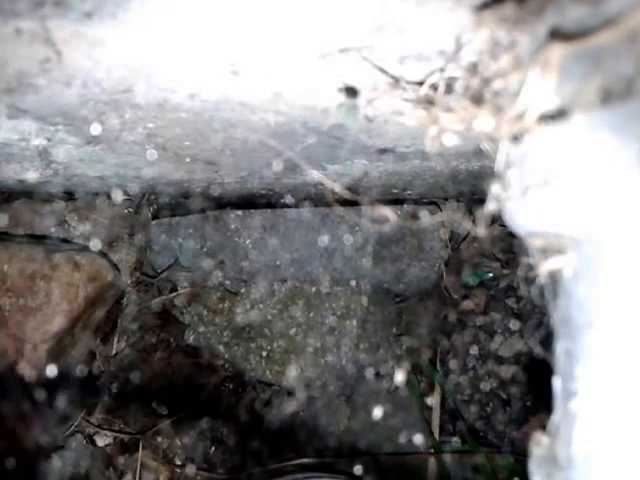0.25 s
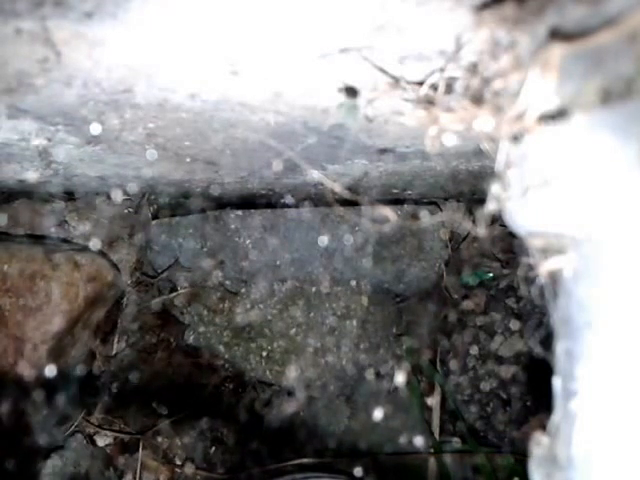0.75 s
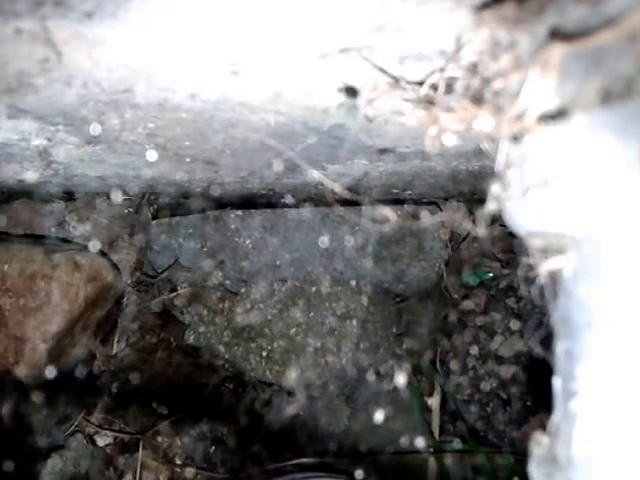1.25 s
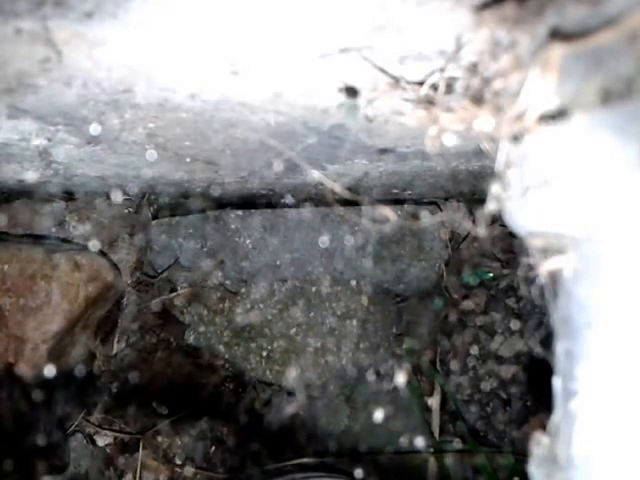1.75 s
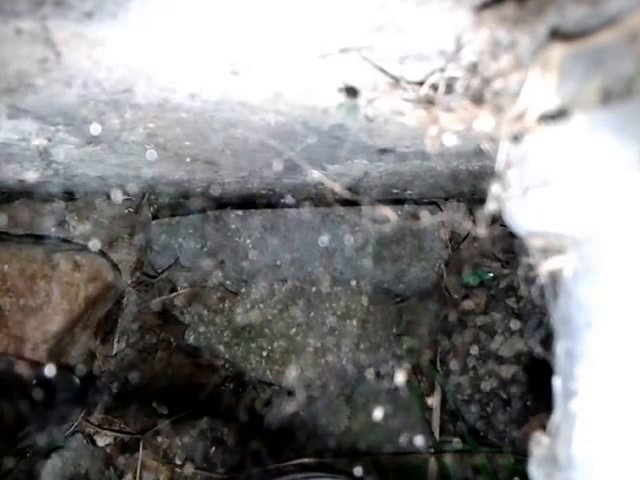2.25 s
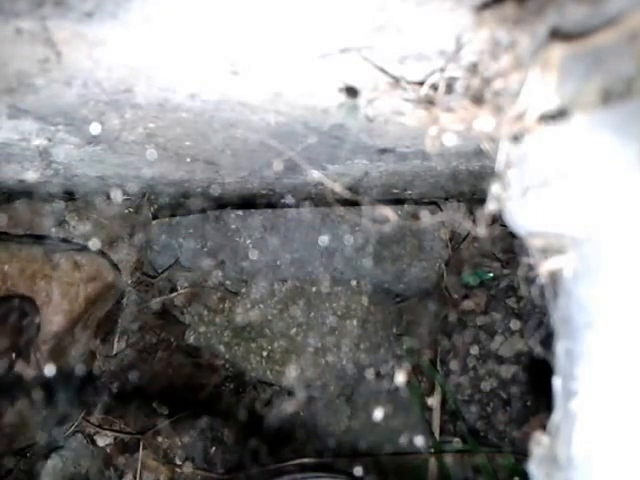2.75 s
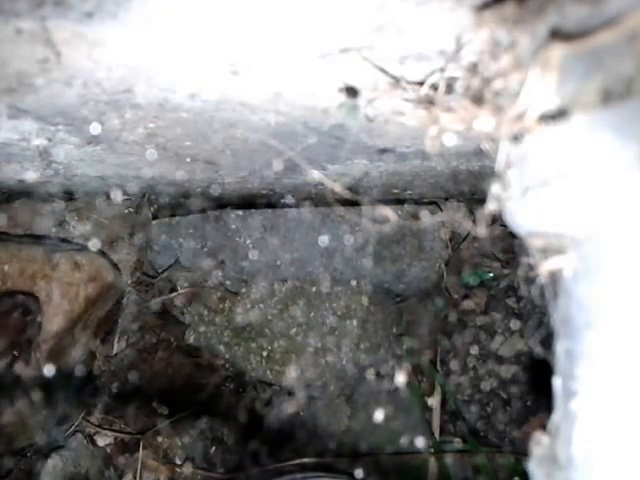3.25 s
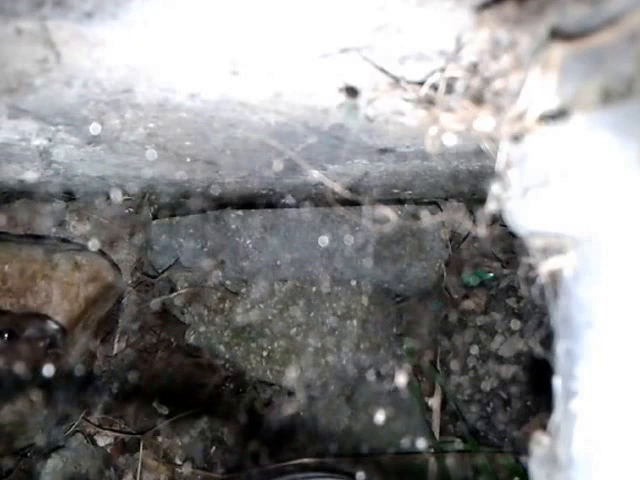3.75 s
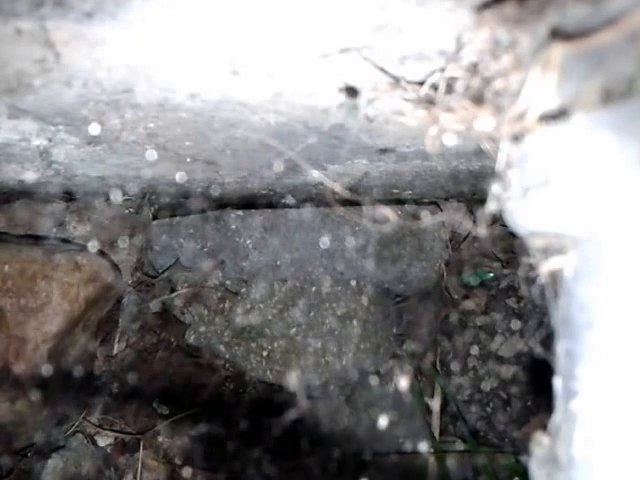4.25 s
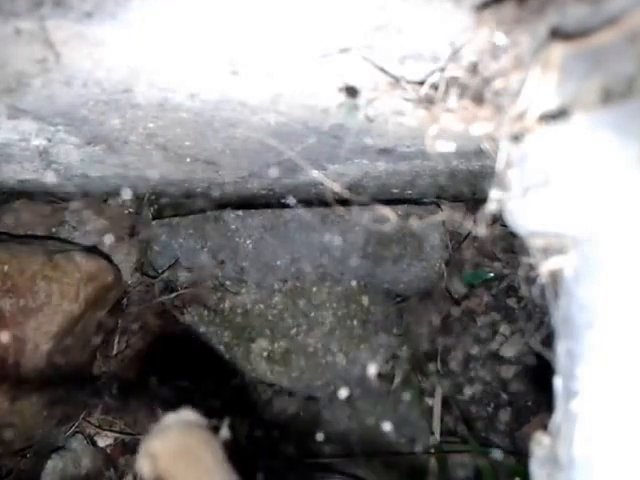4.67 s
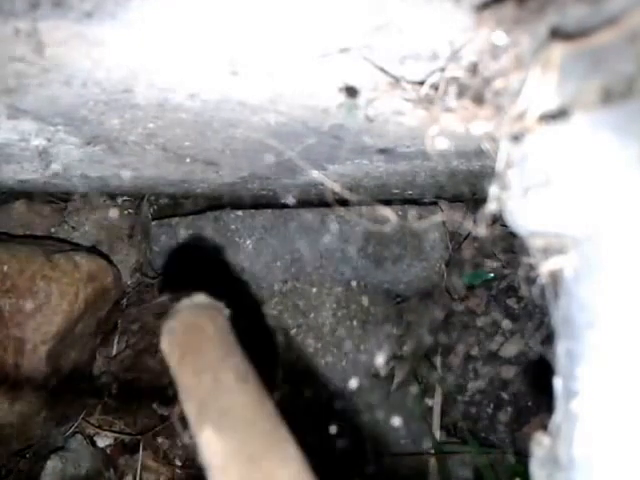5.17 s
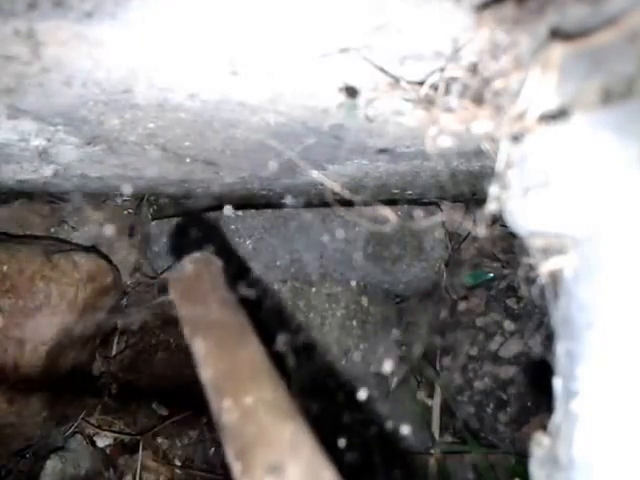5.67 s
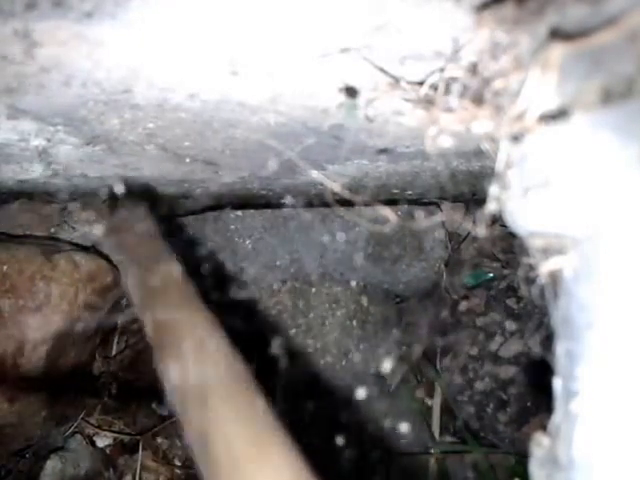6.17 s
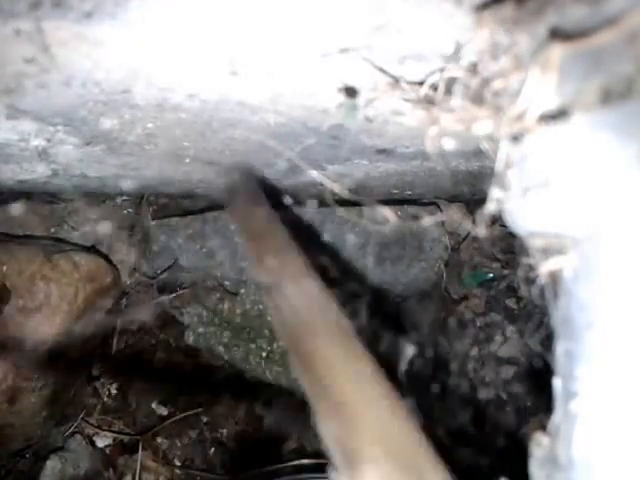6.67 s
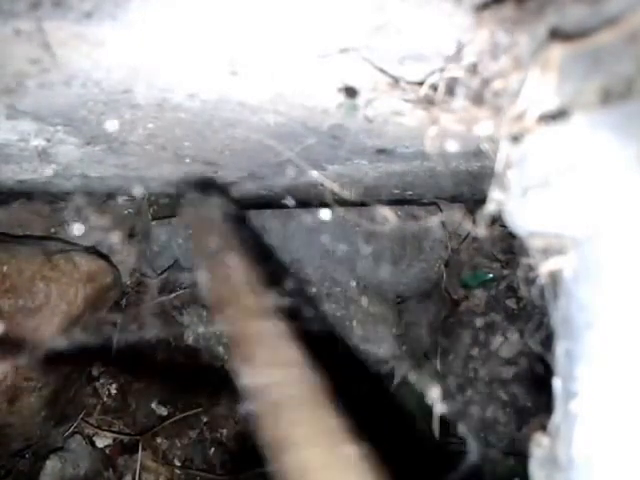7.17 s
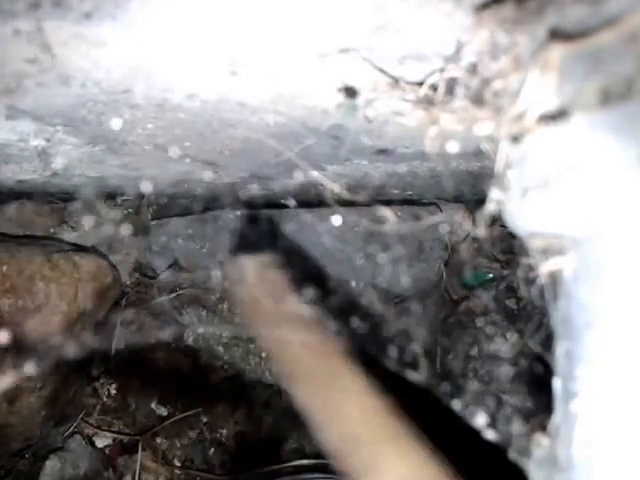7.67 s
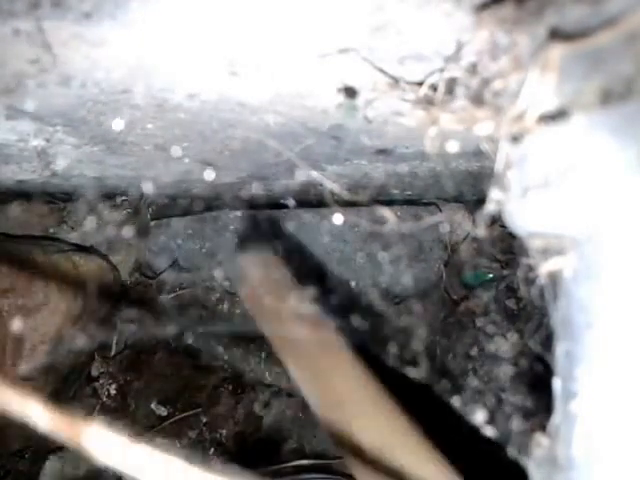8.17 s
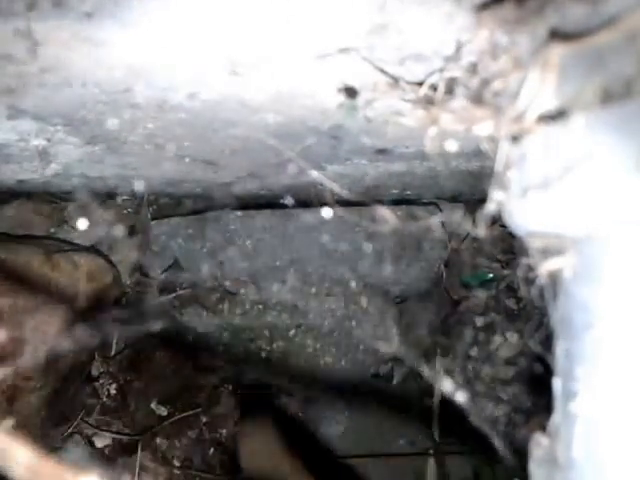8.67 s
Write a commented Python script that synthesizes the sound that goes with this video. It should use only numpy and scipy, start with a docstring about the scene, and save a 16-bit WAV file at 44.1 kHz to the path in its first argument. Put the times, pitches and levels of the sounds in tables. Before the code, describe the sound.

Brief leaf rustle, a quiet lull with a tiny squeak, then busy crunching, scraping and hard wooden knocks on stone, very close.

```python
"""A wooden stick in dry leaves and grit between stones, outdoors, close to a small microphone. Steady hiss and
a low distant rumble lie beneath; the stick first brushes the leaves loosely in noise grains. A faint far whirr,
made of narrow noise, swells twice; from 2 s the stick presses down and squeaks at about 3.3 s. Strokes and
bright snaps then thicken, the tip grinds the grit and rings the stick's middle modes, and the dragged tip
shakes the stick. Knocks on stone ring its short modes, the strongest from 5.6 s on, and the loudest overload
the microphone."""
import sys
import numpy as np
from scipy import signal
from scipy.fft import rfft, irfft, next_fast_len
from scipy.io import wavfile
from scipy.ndimage import uniform_filter1d

SR = 44100
rng = np.random.default_rng(int(sys.argv[2]) if len(sys.argv) > 2 else 0)


def wav_record(signal):
    """Record a signal, one row per channel, as 16-bit PCM in the file named by sys.argv[1]."""
    frames = np.transpose(np.atleast_2d(signal))
    bounded = np.clip(frames, -1, 1)
    # unit amplitude maps onto the largest positive 16-bit level
    quanta = np.round(bounded * 32767).astype(np.int16)
    wavfile.write(sys.argv[1], SR, quanta)


N = 393813
TIME = np.arange(N) / SR  # s

# spectrum of the hiss and far rumble: pitch_hz, density_db (per Hz, relative)
AIR_SPECTRUM = [(12, -32.5), (20, -20), (80, -4), (106, -8), (119, -6.5), (232, -18.5), (427, -26.5),
                (631, -28), (705, -28), (788, -28), (3260, -30), (5530, -25.5), (9390, -25), (14300, -21),
                (15500, -29)]
AIR_DB = -66  # middle level, rms
# faint far whirr: start_s, length_s, level_db
WHIRR_SWELLS = [(.92, 0.65, -79), (2.3, 0.53, -80)]
WHIRR_HZ, WHIRR_FADE_DB_PER_S = 1556, 136

# a twig chafing on stone: start_s, length_s, pitch_hz, peak_db
TWIG_SQUEAKS = [(3.31, 0.031, 3080, -55), (3.302, 0.023, 2030, -62), (3.35, 0.055, 890, -59),
                (3.386, 0.042, 3020, -58), (3.388, 0.08, 4350, -57), (3.406, .06, 5700, -51)]

# strokes through the litter and faint rustles between them: start_s, length_s, leaf_start_db, leaf_end_db,
# drag_db (stick, relative to leaves), grit_db (relative to leaves)
STICK_STROKES = [(0.19, 0.18, -66, -74, -14, -11.5), (0.413, 0.34, -53, -40, -18, -15),
                 (0.819, .035, -58, -53.5, -10.5, -8.5), (.9, 0.15, -68.5, -78, -2, -3.5),
                 (1.045, 0.071, -59, -54, -14, -11.5), (1.15, 0.23, -68.5, -76, -3, -6),
                 (1.5, .28, -68, -74, -6, -10), (2.15, 0.26, -77.5, -62.5, -9.5, -10),
                 (2.45, 0.64, -76.5, -74, -5, -4), (3.16, 0.055, -76.5, -65.5, -2, -2),
                 (3.309, 0.16, -62, -60, -10, -12), (3.55, 0.035, -67, -65.5, -6, -12),
                 (3.62, .38, -80, -85, -14, -8), (4.016, 0.067, -44.5, -46.5, -12, -7),
                 (4.15, 0.21, -68, -70, -10, -13), (4.405, 0.042, -50.5, -44.5, -12, -6.5),
                 (4.469, 0.068, -44, -37, -3, -6), (4.58, 0.11, -47.5, -38, -12.5, -6.5),
                 (4.758, 0.086, -44, -41.5, -9.5, -7.5), (4.87, 0.043, -42, -37, -9, -7),
                 (4.93, 0.18, -43, -50.5, -4.5, -5), (5.16, 0.087, -63.5, -71, -5, -8),
                 (5.25, 0.042, -59.5, -47.5, -6, -4), (5.33, 0.066, -57.5, -53, -9.5, -7),
                 (5.442, 0.045, -51, -44, -10, -7.5), (5.52, 0.19, -51, -54.5, -12, -11),
                 (5.78, 0.033, -44.5, -43.5, -11, -8), (5.841, 0.095, -55, -45.5, -8.5, -3),
                 (5.97, 0.13, -49.5, -59, -6, -4), (6.142, 0.19, -55.5, -58, -6.5, -7),
                 (6.34, 0.16, -71, -69.5, -7, -9.5), (6.492, 0.25, -42.5, -49, -13, -6.5),
                 (6.874, 0.19, -51, -60, -9.5, -9.5), (7.18, 0.11, -53, -57, -9, -8.5),
                 (7.31, 0.042, -53, -44.5, -10, -9.5), (7.39, 0.08, -54.5, -38.5, -6.5, -0.5),
                 (7.55, .29, -61, -56, -8, -12.5), (7.85, 0.025, -44.5, -51.5, -13.5, -14.5),
                 (7.89, 0.11, -53.5, -47.5, -13.5, -10), (8.039, 0.075, -51, -41, -9, -7),
                 (8.13, 0.057, -46.5, -49.5, -8.5, -27), (8.191, 0.088, -50.5, -42.5, 0.5, -2.5),
                 (8.33, 0.079, -73, -53.5, -15, -14), (8.41, 0.066, -55, -44.5, -4.5, -9),
                 (8.53, 0.1, -52, -46.5, -12.5, -15), (8.63, 0.26, -43.5, -46.5, -14.5, -10),
                 (8.89, 0.047, -43.5, -36.5, -17, -14)]
BITE_DB_PER_S, SETTLE_DB_PER_S = 1501.5, 300.5  # rise before a stroke, fall after it
# litter stirring faintly between strokes: leaves_db, stick_db, grit_db
IDLE_LEVELS = [-85, -90.5, -89]
# leaves brushed loosely, before the stick presses down: pitch_hz, density_db (per Hz, relative)
LOOSE_LEAF_SPECTRUM = [(1470, -33), (2500, -6), (3120, -12), (6440, -4), (7110, -5.5), (7860, -2),
                       (11100, -9), (14500, -14), (15500, -18.5)]
# leaves under the pressing stick: pitch_hz, density_db (per Hz, relative)
PRESSED_LEAF_SPECTRUM = [(1470, -41.5), (2500, -8), (2890, -7.5), (3890, -9), (4780, -5.5), (5620, -2),
                         (6060, -3), (6640, -4.5), (8880, -7.5), (14400, -15), (15500, -19)]
PRESS_S = 2.0
# rings of curled leaves: pitch_hz, width_hz, level_db (relative)
CURLED_LEAF_RINGS = [(4347, 100, -2.5), (5630, 450, -0.5), (6330, 330, 0), (6900, 730, -6)]
# middle rings of the stick, shaken as its tip scrapes the grit: pitch_hz, width_hz, level_db (relative)
STICK_MIDDLE_RINGS = [(1260, 200, -0.4), (1550, 790, -8.5), (1853, 120, 3), (2300, 220, -8), (3050, 530, -0.5)]
# broad rings of the dragged stick, damped by the hand: pitch_hz, width_hz, level_db (relative)
DRAGGED_STICK_RINGS = [(289, 99, 5), (356, 17, -6), (520, 160, -2), (840, 220, -5)]

# leaves and twigs snapping: start_s, peak_db (before filtering), centre_hz
LEAF_SNAPS = [(0.189, -50, 6030), (0.293, -48.5, 6500), (0.414, -54, 6640), (0.447, -42, 6400),
              (0.5327, -29.5, 7700), (0.5472, -23.5, 8000), (0.5672, -29, 9200), (0.6335, -27, 6700),
              (0.704, -25.5, 6860), (0.753, -25.5, 6900), (0.8453, -48, 6540), (2.61, -51.5, 5500),
              (3.318, -49, 6250), (3.569, -38.5, 6370), (4.0156, -25.5, 5800), (4.4013, -26, 5970),
              (4.653, -26, 5640), (4.671, -33, 6550), (4.748, -13, 6500), (4.788, -22.5, 6000),
              (4.822, -25, 5800), (4.8377, -30, 5380), (4.8688, -29, 6900), (4.9188, -24, 6300),
              (5.007, -26, 5630), (5.0983, -48, 5470), (5.178, -55, 3540), (5.452, -22, 5330),
              (5.468, -26.5, 6000), (5.7776, -21.5, 5870), (5.797, -26.5, 6400), (6.027, -37, 6500),
              (6.082, -36, 6540), (6.169, -34.5, 6000), (6.2074, -35.5, 4570), (6.26, -45, 7000),
              (6.292, -37.5, 6130), (6.4895, -24, 5400), (6.8997, -34, 5380), (6.946, -35, 5270),
              (7.3244, -29, 5740), (7.352, -33, 5500), (7.652, -33.5, 6000), (7.734, -32.5, 5800),
              (7.8528, -33, 6000), (8.895, -29, 5780)]
SNAP_T60_S = 0.025

# bending modes of the stick: pitch_hz, level_db (relative), t60_s (before the ring factor)
STICK_MODES = [(327.7, -9.5, 0.05), (431, -4.5, 0.03), (557, -9, 0.033), (749, -2.8, 0.031),
               (1329, -5, 0.016), (1407, -7.5, 0.01), (1791, 0.7, 0.013), (2066, 3.5, 0.0089),
               (2831, -2, 0.015), (3487, -5, 0.013), (3980, -7, 0.014), (5067, -1.5, 0.012),
               (5932, 3.5, 0.014), (6806, -3, 0.013)]
# stick on stone: start_s, peak_db (before filtering), place_hz (place struck, as loudest ring),
# low_hz (loudest low ring), low_db (low modes), high_db (high modes), ring (factor on fading times)
STONE_KNOCKS = [(3.189, -42, 2040, 880, -1, -2, 1.8), (4.339, -50, 1270, 307, 6, -9, 1.2),
                (4.494, -25.5, 1260, 294, -1.5, -21, 1), (5.571, -7, 1620, 394, -7.5, -10, 1.5),
                (5.58, -15.5, 1280, 510, -3.5, -10, 1.62), (6.151, -29, 1300, 503, -6.5, -0.5, 2),
                (6.961, 2.5, 1750, 750, -10, -0.5, 1.47), (7.175, -14, 1140, 830, -13.5, -10.5, 1.5),
                (7.407, 7, 1760, 764, -8, -6.5, 1.07), (7.464, -4, 2030, 750, -5.5, -5.5, 1.63),
                (7.489, -9.5, 1770, 750, 0.5, -10, 1.7), (8.185, -17, 985, 730, 2, -23, 0.76),
                (8.205, -20.5, 1030, 764, 2.5, -13, 1.7), (8.27, -2.5, 2130, 294, -2.5, -1, 0.96),
                (8.471, -21.5, 1780, 680, 3.5, -2.5, 1.24), (8.615, -24, 1740, 720, 2.5, 4.5, 1.4),
                (8.651, -31, 1780, 696, 11, -26, 1.9), (8.751, -5, 1360, 800, -13, -6.5, 1.6),
                (8.916, -26, 1740, 750, 5, -5, 1.4)]
LOW_HZ, HIGH_HZ = 1000, 3300  # low modes lie below the first, high modes above the second

TOP_HZ = 15050  # upper edge of the microphone's band


def undb(db):
    """Amplitude ratio of a level in dB."""
    return 10 ** (np.asarray(db) / 20)


def unit(x):
    """Scale x to rms 1."""
    return x / np.sqrt(np.mean(x ** 2))


def colour(x, points):
    """Shape the spectrum of x by (Hz, dB) points, straight lines over log frequency; rms 1."""
    hz, db = np.transpose(points)
    size = next_fast_len(N)
    log_hz = np.log(np.arange(size // 2 + 1) * SR / size + 1)
    gain = undb(np.interp(log_hz, np.log(hz), db, left=-90, right=-90))
    return unit(irfft(rfft(x, size) * gain, size)[:N])


def walk(rate):
    """Random levels, rate per second, slewed from one to the next; rms 1."""
    hold = int(SR / rate)
    steps = np.repeat(rng.standard_normal(N // hold + 1), hold)
    return unit(uniform_filter1d(steps, hold)[:N])


def span(start, length, first_db, last_db, rise, fall):
    """Gain that slides between two levels; it rises before and falls after at fixed dB per second."""
    before_db = np.maximum(rise * (start - TIME), 0)
    after_db = np.maximum(fall * (TIME - start - length), 0)
    level_db = np.interp(TIME, [start, start + length], [first_db, last_db])
    return undb(level_db - before_db - after_db)


def rings(x, modes, flicker_db):
    """Noise through steep resonances, each swelling by itself; rms 1."""
    twice = np.sqrt(np.sqrt(2) - 1)  # two passes narrow a resonance by this factor
    total = np.zeros(N)
    for hz, width, db in modes:
        ring = signal.filtfilt(*signal.iirpeak(hz, twice * hz / width, SR), x)
        total += undb(db + flicker_db * walk(11)) * ring
    return unit(total)


def grains(rate, spread_db, tail_s, bed):
    """Tiny breaks of very unequal size, each a short puff of noise, over a finer bed."""
    breaks = rng.random(N) < rate / SR
    size = breaks * undb(spread_db * np.minimum(rng.exponential(size=N), 4.5))
    puffs = signal.lfilter([1], [1, -np.exp(-1 / (tail_s * SR))], size ** 2)  # power
    return np.sqrt(puffs / puffs.mean() + bed) * rng.standard_normal(N)


def add(out, s, sound, peak_db):
    """Mix a sound into out at s seconds, scaled to the given peak."""
    i = int(s * SR)
    out[i:i + len(sound)] += (sound * undb(peak_db) / np.abs(sound).max())[:N - i]


def hiss_and_rumble():
    """Steady shaped noise whose level wavers slightly."""
    return colour(rng.standard_normal(N), AIR_SPECTRUM) * undb(AIR_DB + 0.55 * walk(2.8))


def far_whirr():
    """Narrow noise around one pitch that comes and goes."""
    fade = WHIRR_FADE_DB_PER_S
    swell = sum(span(s, length, db, db, fade, fade) for s, length, db in WHIRR_SWELLS)
    return rings(rng.standard_normal(N), [(WHIRR_HZ, 110, 0)], 1.5) * swell


def squeaks():
    """A twig chafing on stone: narrow, rough rings of noise that swell and fade."""
    out = np.zeros(N)
    for s, length, hz, peak_db in TWIG_SQUEAKS:
        size = int(length * SR)
        ring = signal.filtfilt(*signal.iirpeak(hz, 14, SR), rng.standard_normal(size))
        add(out, s, ring * np.hanning(size), peak_db)
    return out


def stroke_gains():
    """Gains of leaves, dragged stick and grit: the powers of all strokes add to the idle stirring."""
    power = undb(IDLE_LEVELS)[:, None] ** 2
    for *stroke, drag_db, grit_db in STICK_STROKES:
        leaf_gain = span(*stroke, BITE_DB_PER_S, SETTLE_DB_PER_S)
        power = power + np.outer(undb([0, drag_db, grit_db]), leaf_gain) ** 2
    return np.sqrt(power)


def crackling_leaves():
    """Dense tiny breaks, coloured by loose then pressed leaves, also ring the curled leaves."""
    crackle = grains(900, 3.4, 0.002, 0.39)
    loose = colour(crackle, LOOSE_LEAF_SPECTRUM)
    pressed = colour(crackle, PRESSED_LEAF_SPECTRUM)
    leaves = np.where(TIME < PRESS_S, loose, pressed)
    return unit(leaves + 0.8 * rings(crackle, CURLED_LEAF_RINGS, 4.6))


def scraped_stick(slip):
    """The small slips of the tip on the grit excite the middle rings of the stick."""
    return rings(slip, STICK_MIDDLE_RINGS, 2.8)


def dragged_stick(slip):
    """The same slips shake the lowest rings of the stick, thinned below 230 Hz."""
    high_pass = signal.butter(3, 230, "high", fs=SR, output="sos")
    return signal.sosfilt(high_pass, rings(slip, DRAGGED_STICK_RINGS, 4.0))


def litter():
    """One stuttering tip moves leaves, grit and stick together; the stick's level stutters least."""
    leaf_gain, drag_gain, grit_gain = stroke_gains()
    stutter_db = walk(45)
    slip = grains(550, 2.6, 0.0029, 0.23)
    leaves = crackling_leaves() * leaf_gain * undb(stutter_db)
    grit = scraped_stick(slip) * grit_gain * undb(stutter_db)
    drag = dragged_stick(slip) * drag_gain * undb(0.62 * stutter_db)
    return leaves + grit + drag


def snaps():
    """A leaf or twig snaps: a burst of bright noise over a duller body that dies fast."""
    out, t = np.zeros(N), TIME[:SR // 8]
    envelope = np.exp(-np.log(1000) * t / SNAP_T60_S) * np.minimum(t / 0.0012, 1)
    for s, peak_db, hz in LEAF_SNAPS:
        noise = rng.standard_normal(len(t))
        body = signal.lfilter(*signal.iirpeak(2200, 0.6, SR), noise)
        bright = signal.filtfilt(*signal.iirpeak(hz, 1.4, SR), noise)
        add(out, s, (bright + 0.19 * body) * envelope, peak_db)
    return out


def stick_ringing(t, place_hz, low_hz, low_db, high_db, ring):
    """Decaying bending modes, loudest near those that the struck place favours."""
    hz, db, t60 = np.transpose(STICK_MODES)
    phase, size = rng.standard_normal((2, len(hz)))
    low_mode_db = low_db - 13 * np.abs(np.log2(hz / low_hz))  # 13 dB per octave
    middle_db = -8 * np.abs(np.log2(hz / place_hz))
    place_db = np.where(hz < LOW_HZ, low_mode_db, np.where(hz > HIGH_HZ, high_db, middle_db))
    gain = undb(db + place_db + 1.8 * size)
    # the stone damps the high modes whatever the grip
    fade_s = np.where(hz > HIGH_HZ, t60, ring * t60)
    fade = np.exp(-np.log(1000) * t[:, None] / fade_s)
    return (fade * np.sin(2 * np.pi * t[:, None] * hz + 1.02 * phase)) @ gain


def gritty_contact(t, place_hz, high_db, ring):
    """Grit roughens the contact as a short noise burst and scatters after it as a longer tail."""
    noise = rng.standard_normal((2, len(t)))
    dull = signal.filtfilt(*signal.iirpeak(place_hz, 0.7, SR), noise[0])
    bright = signal.filtfilt(*signal.iirpeak(5600, 0.8, SR), noise[1])
    contact = 0.97 * np.exp(-(t / 0.0044) ** 2)
    scatter = 0.27 * np.exp(-t / (0.0079 * ring))
    return (dull + 0.5 * undb(high_db) * bright) * (contact + scatter)


def knocks():
    """Each blow on stone rings the stick and crunches grit; the sum is thinned below 260 Hz."""
    out, t = np.zeros(N), TIME[:SR // 6]
    onset = np.clip(t / 0.000471 - 1, 0, 1)  # contact builds within a millisecond
    for s, peak_db, place_hz, low_hz, low_db, high_db, ring in STONE_KNOCKS:
        modes = stick_ringing(t, place_hz, low_hz, low_db, high_db, ring)
        crack = gritty_contact(t, place_hz, high_db, ring)
        add(out, s, (modes + crack) * onset, peak_db)
    return signal.sosfilt(signal.butter(3, 260, "high", fs=SR, output="sos"), out)


def ledge_echo(near):
    """The stone ledge returns a few quick, faint echoes."""
    echoes = [(0.0031, 0.033), (0.0074, 0.017), (0.0113, 0.014)]  # delay in s, gain
    return sum(gain * np.roll(near, int(delay * SR)) for delay, gain in echoes)


def scene():
    """Far air, chafing and litter, then the close snaps and knocks with their echoes."""
    background = hiss_and_rumble() + far_whirr()
    # leaves and wood give out little above the resonance of the microphone port
    soften = signal.butter(1, 11000, fs=SR, output="sos")
    near = signal.sosfilt(soften, knocks() + snaps())
    return (background + squeaks() + litter() + near + ledge_echo(near))[None]


def record(dry):
    """A wind filter turns the bass down while the treble is busy; peaks clip unevenly, which thumps; the top is cut."""
    bass = signal.sosfiltfilt(signal.butter(3, 120, fs=SR, output="sos"), dry)
    busy = uniform_filter1d(np.minimum(np.abs(dry - bass), 0.006), int(0.06 * SR))
    bass_cut = busy ** 2 / (busy ** 2 + 0.0022 ** 2)  # 0 keeps the bass, 1 removes it
    overloaded = np.clip(dry - bass * bass_cut, -0.96, 0.86)
    return signal.sosfilt(signal.ellip(10, 0.2, 60, TOP_HZ, fs=SR, output="sos"), overloaded)


dry = scene()
out = record(dry)
wav_record(out)
```